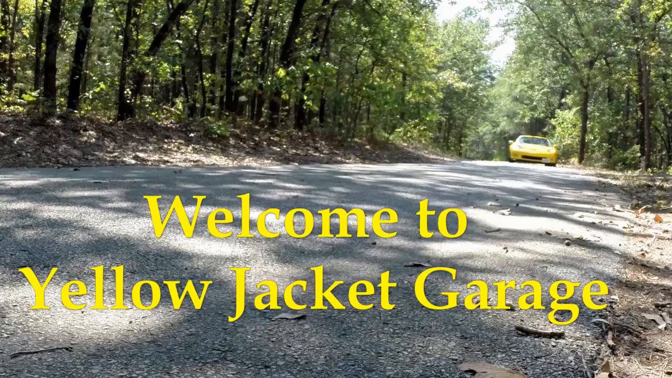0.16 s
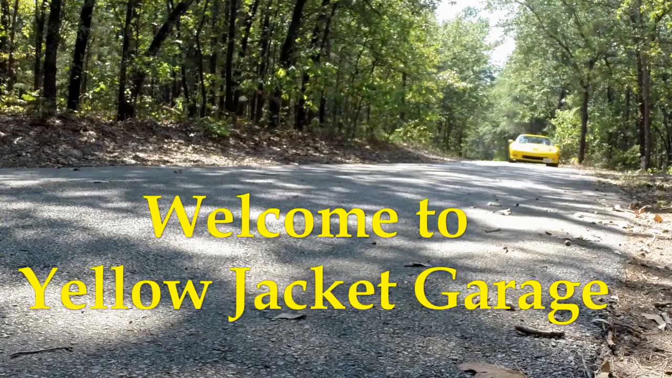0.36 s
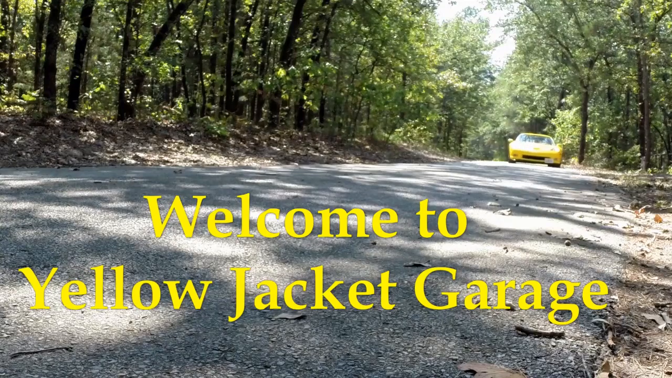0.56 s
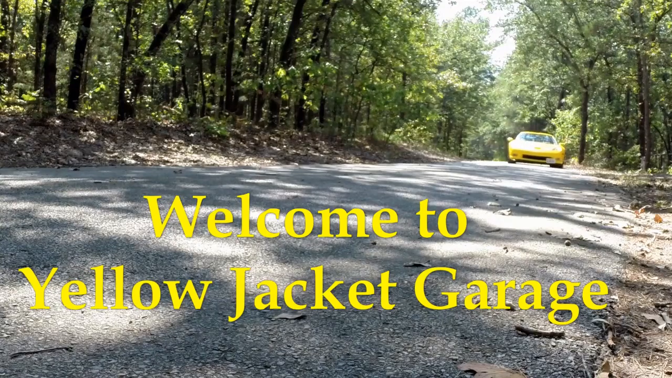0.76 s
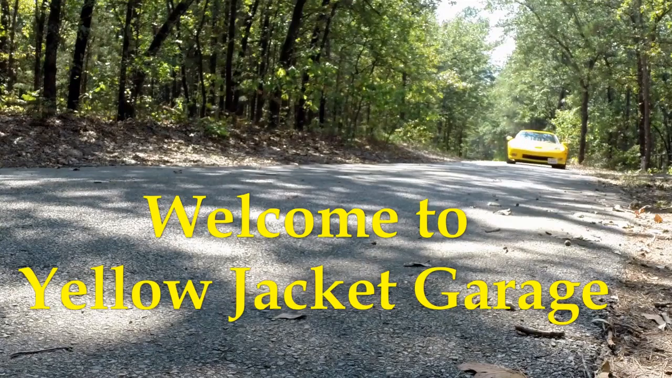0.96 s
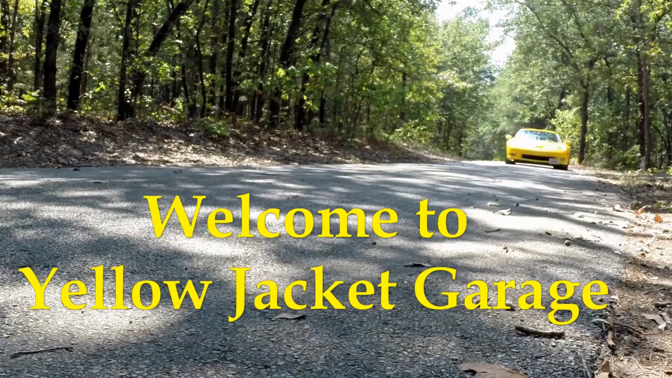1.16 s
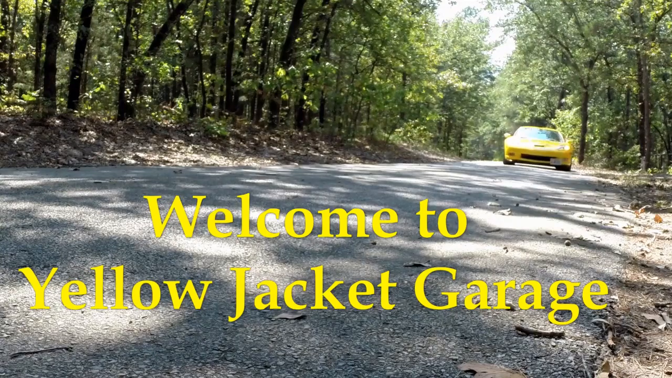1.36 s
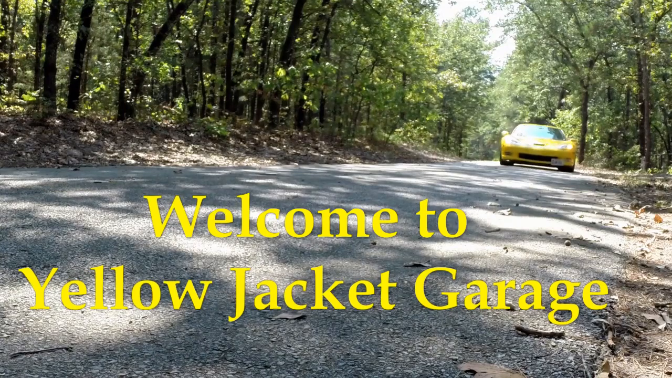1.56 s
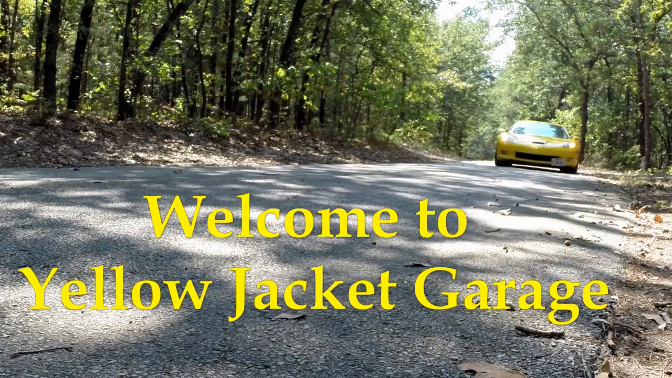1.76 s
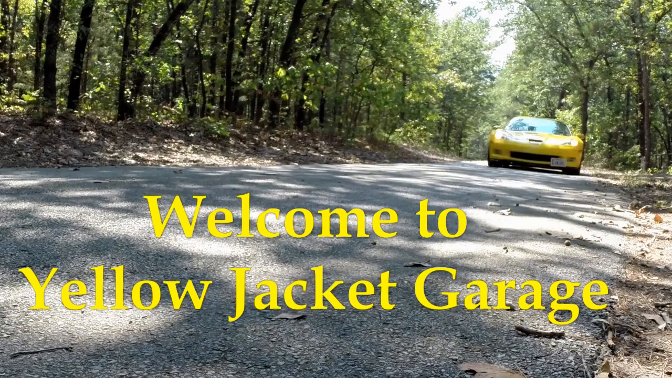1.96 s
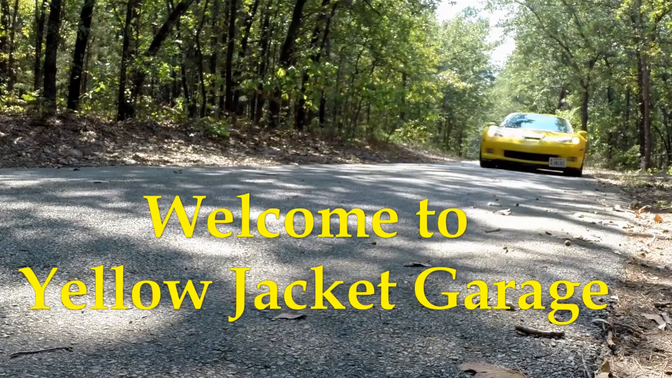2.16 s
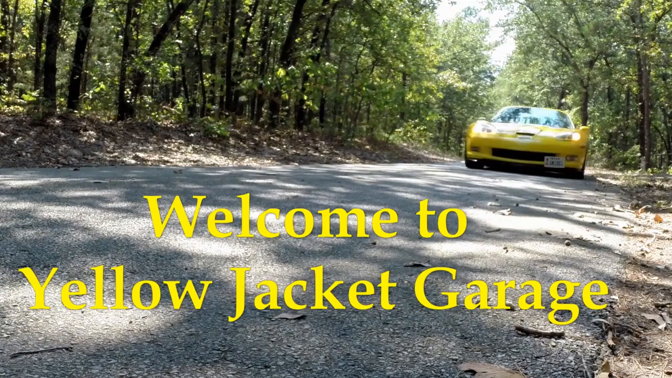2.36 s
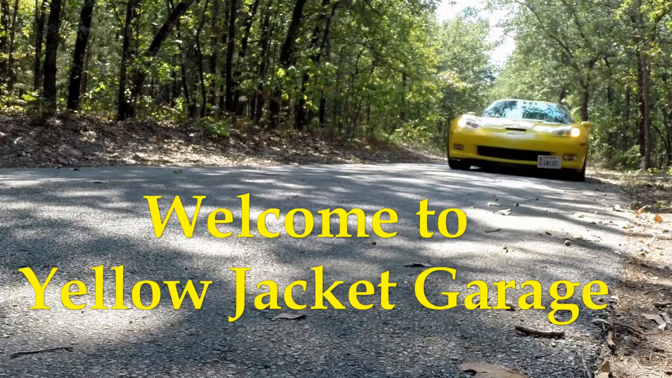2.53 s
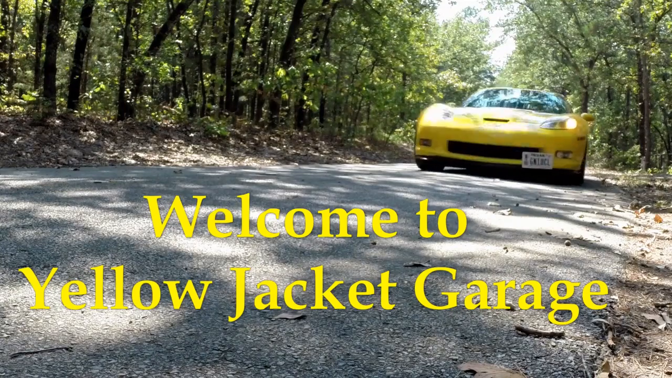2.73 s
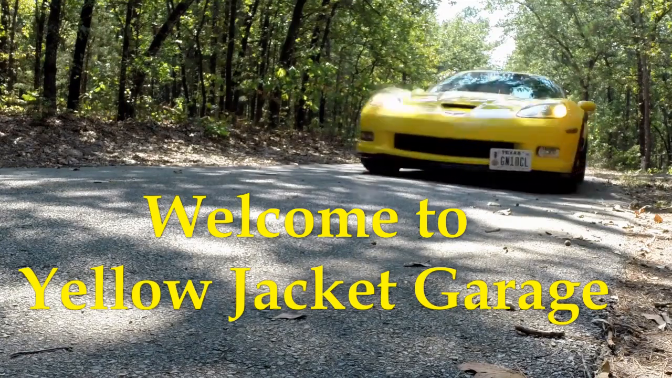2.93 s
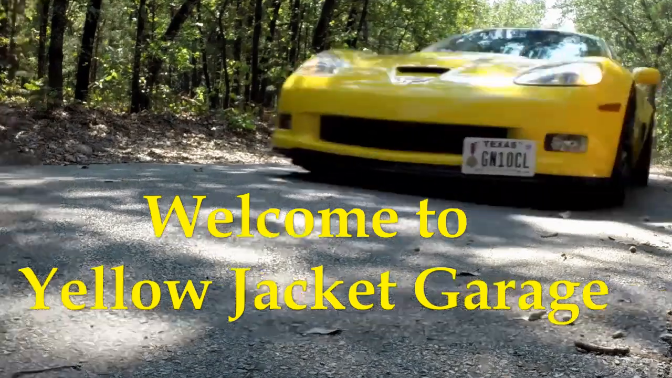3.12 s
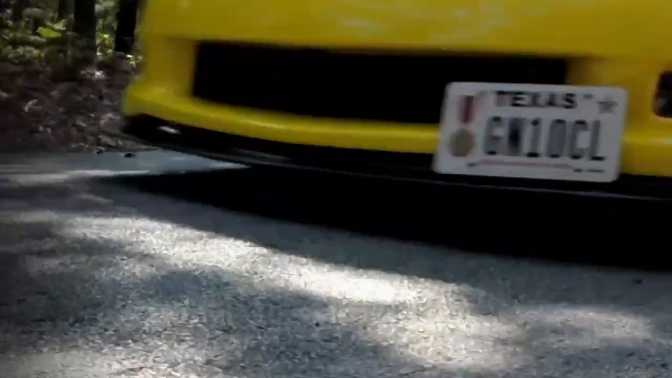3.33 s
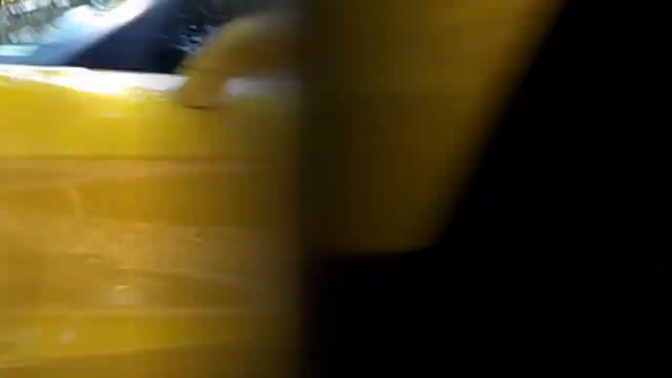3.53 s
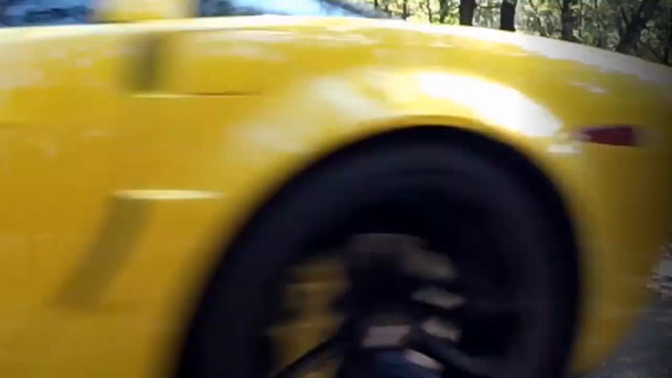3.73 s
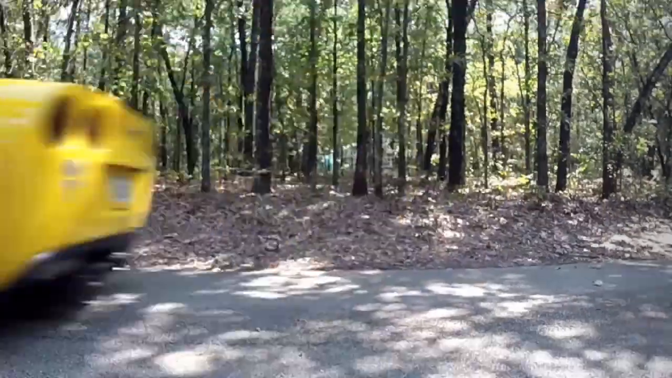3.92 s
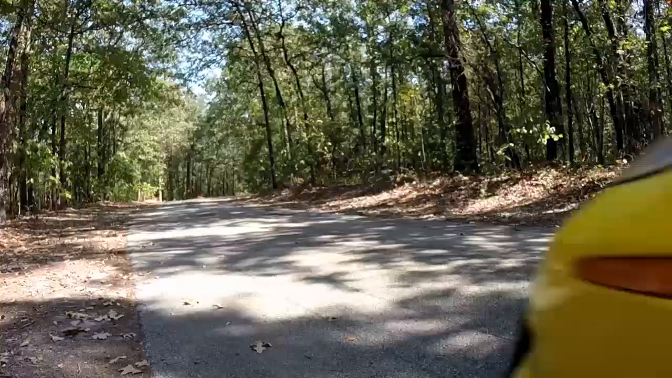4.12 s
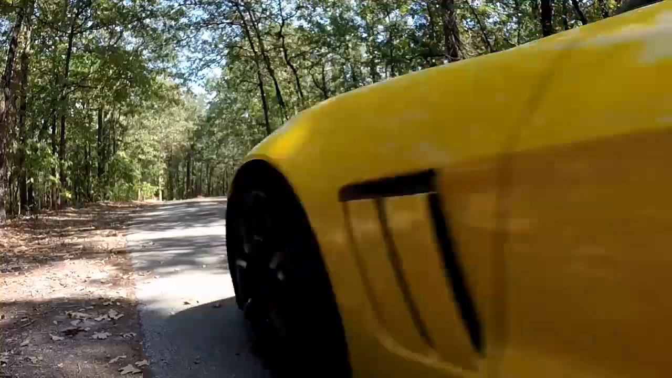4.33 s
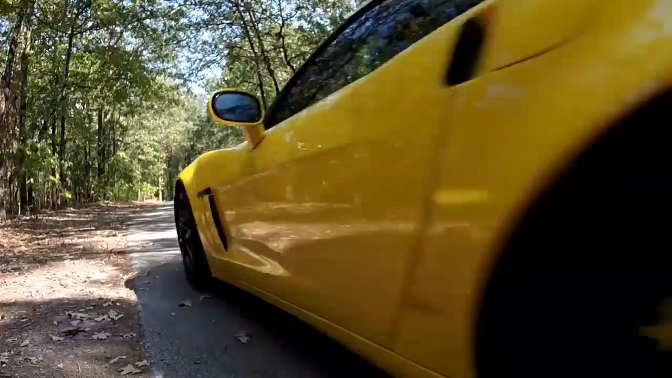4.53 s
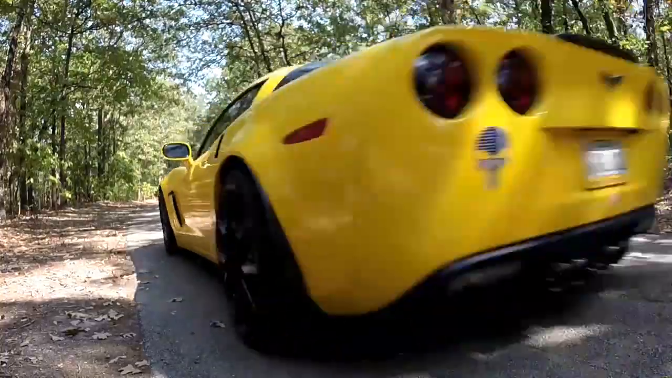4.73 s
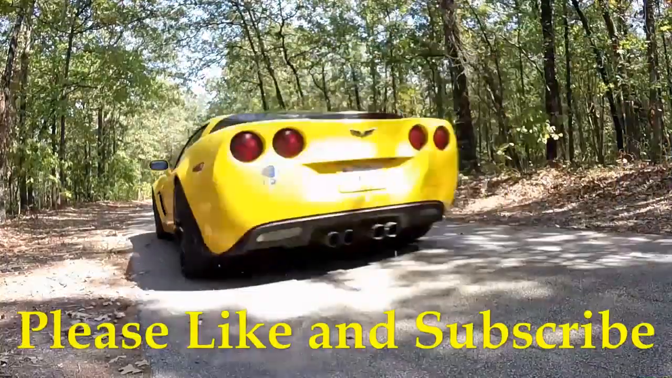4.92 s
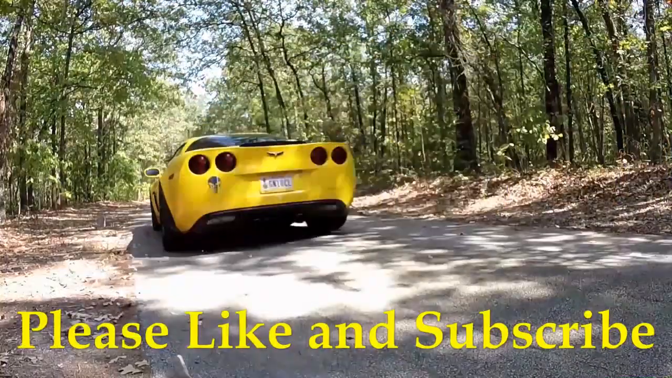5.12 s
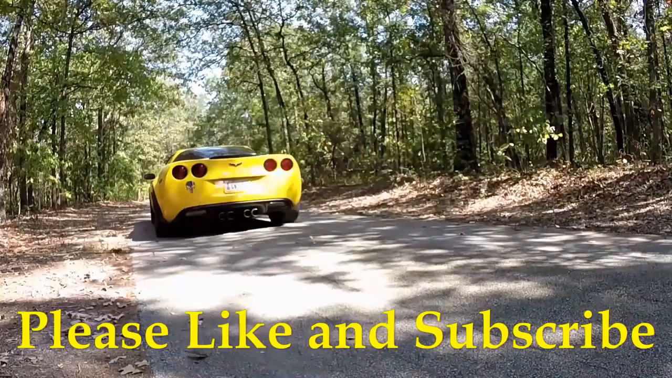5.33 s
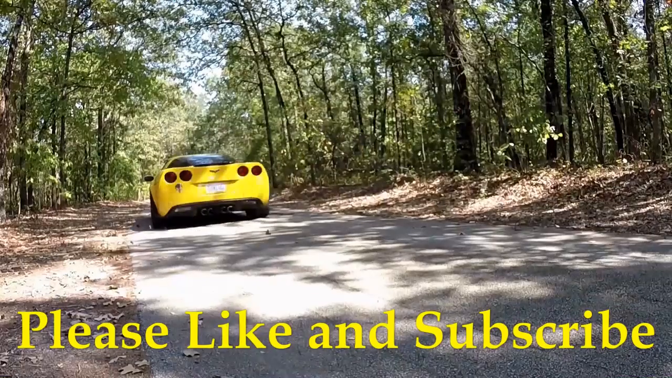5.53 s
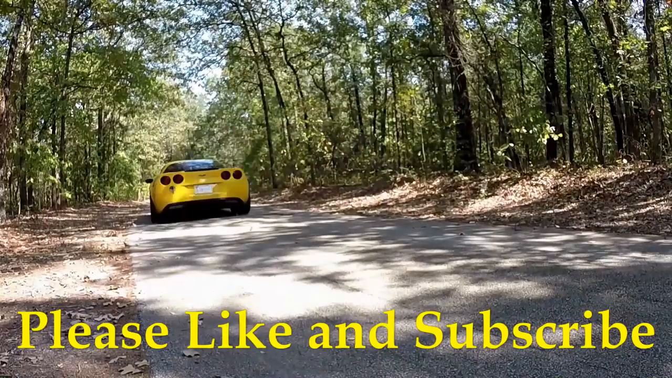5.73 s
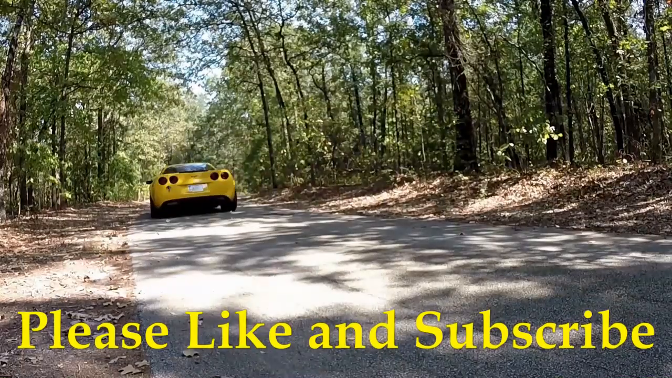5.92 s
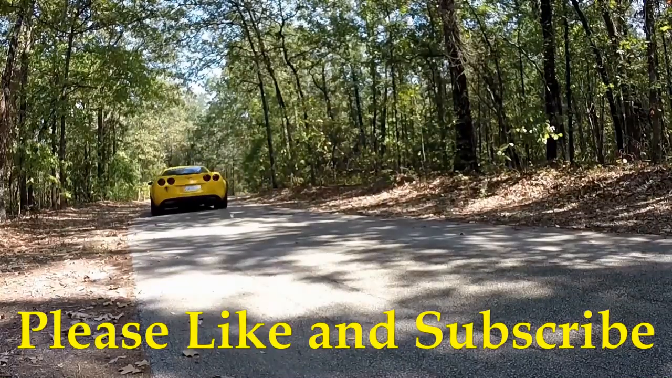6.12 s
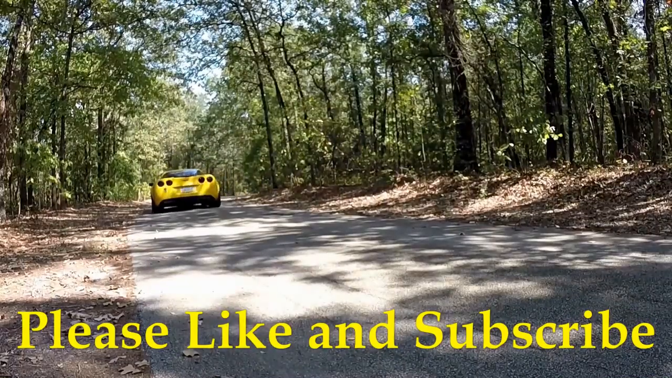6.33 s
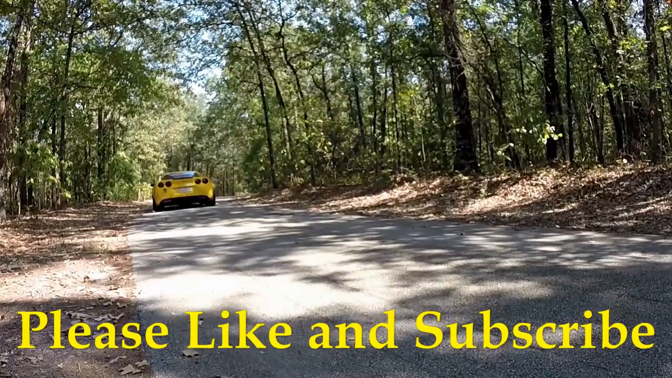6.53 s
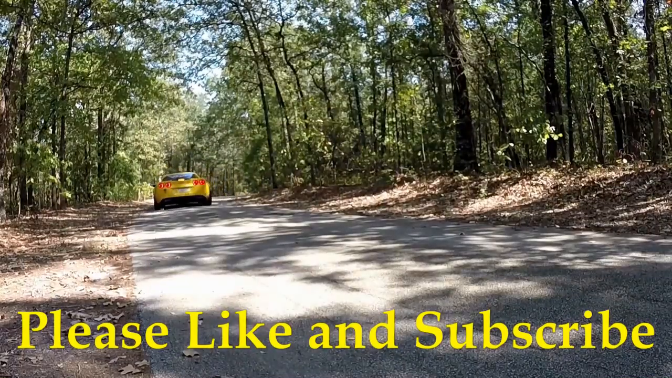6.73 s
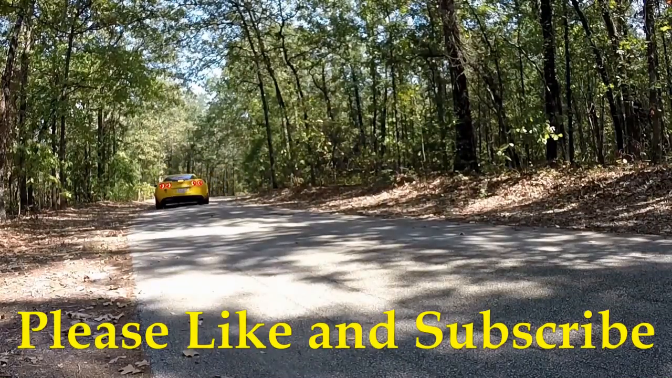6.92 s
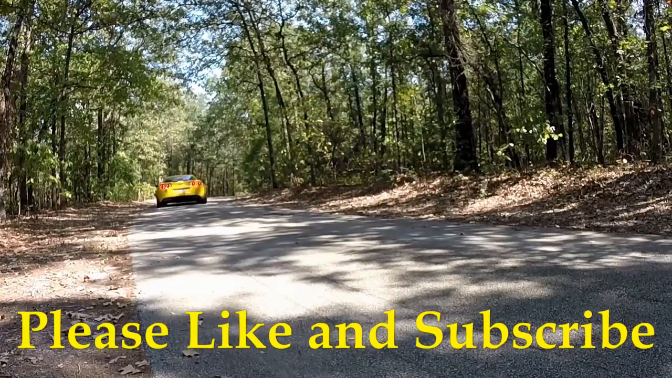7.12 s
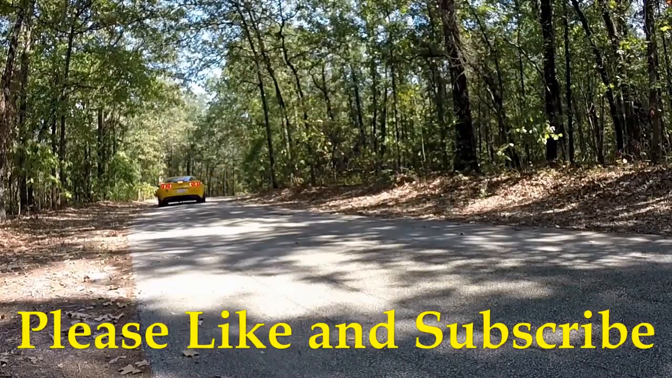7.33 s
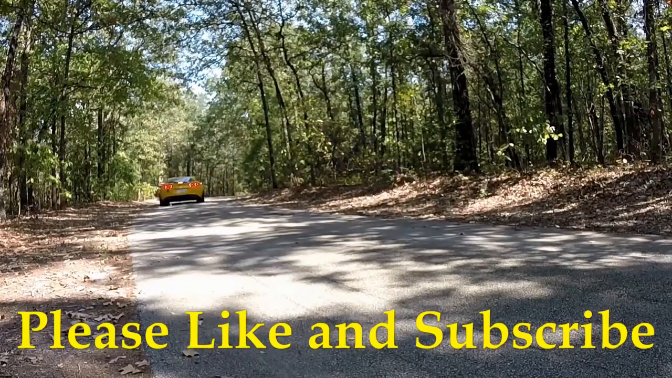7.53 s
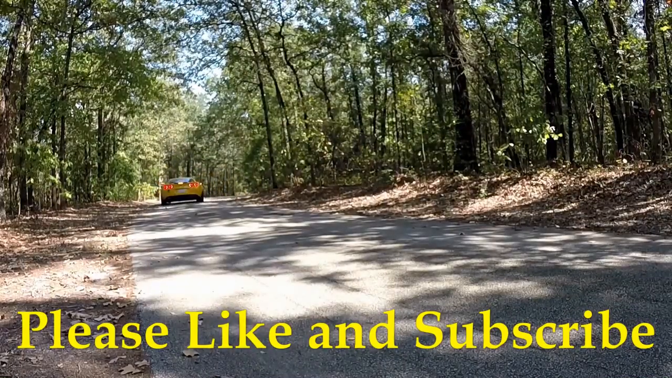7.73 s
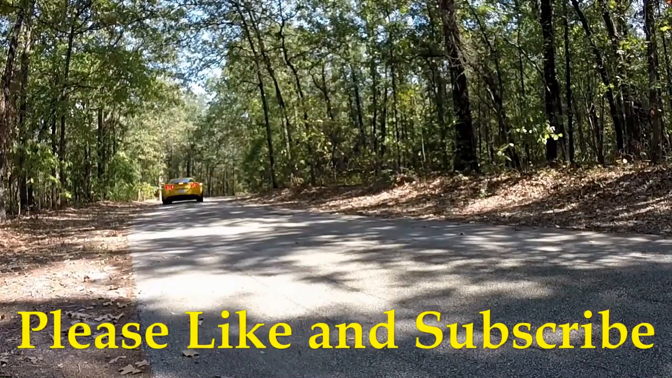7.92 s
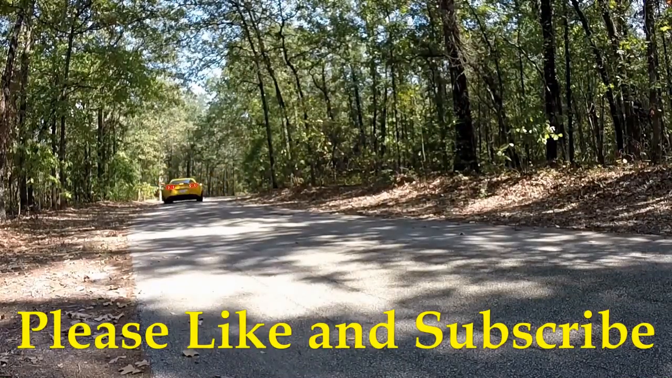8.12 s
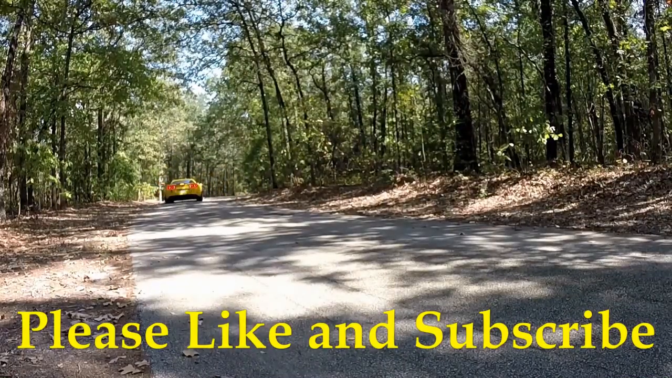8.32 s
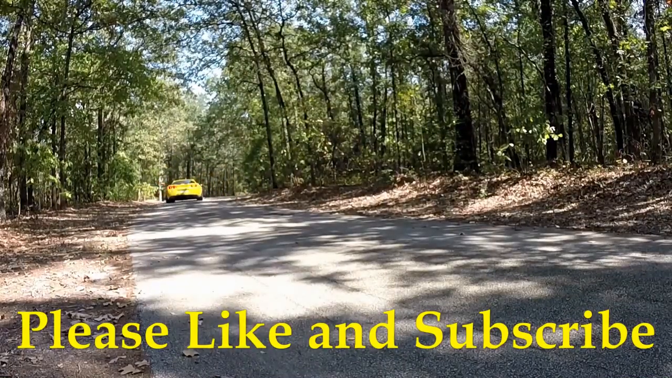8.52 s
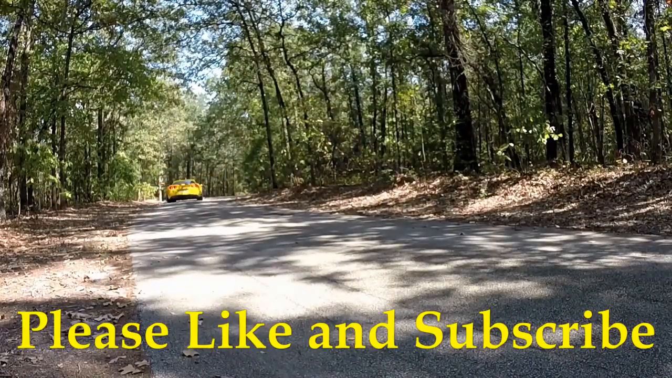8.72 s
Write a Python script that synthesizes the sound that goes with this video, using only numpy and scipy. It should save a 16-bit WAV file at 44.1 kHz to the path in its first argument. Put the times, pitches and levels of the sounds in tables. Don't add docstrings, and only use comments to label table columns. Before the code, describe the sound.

On a quiet forest lane, a powerful eight-cylinder car approaches from a distance, its low hum climbing and growing lumpy. Close by it bangs once and blips upward. An abrupt cut brings a second close pass: bright tyre hiss and raspy exhaust, then an uneven, popping burble that sinks in pitch and fades. Grit ticks occasionally. Close stereo roadside microphone, nearly centred, with slightly dulled treble and faint tree reflections.

```python
import sys
import numpy as np
from scipy import signal
from scipy.fft import rfft, irfft, next_fast_len
from scipy.io import wavfile
from scipy.ndimage import uniform_filter1d, map_coordinates

SR = 44100
rng = np.random.default_rng(int(sys.argv[2]) if len(sys.argv) > 2 else 0)


def rack_gain(trim_db):
    fader = np.asarray(trim_db, float)
    return 10 ** (fader / 20)


def dump(signal):
    limited = np.clip(np.atleast_2d(signal).T, -1, 1)
    pcm = np.round(limited * 32767).astype(np.int16)
    wavfile.write(sys.argv[1], SR, pcm)


N = 386757

# [f/Hz, level/dB per Hz]
TAILPIPE_RING = [(220, -46.5), (380, -15.5), (409, -10), (462, -2.5), (515, -5.5), (575, 0), (623, -6.5),
                 (691, 0.5), (910, -10.5), (1070, -31.5), (1170, -21.5), (1500, -30.5), (1950, -53.5),
                 (3300, -120)]


def level(x, db):
    return x * rack_gain(db) / np.sqrt(np.mean(x ** 2))


def curves(table):
    s, *columns = np.transpose(table)
    return [np.interp(np.arange(N) / SR, s, c) for c in columns]


def shape(table, hz):
    f, db = np.transpose(table)
    return np.interp(np.log(hz + 1), np.log(f), db)


def colour(x, table, beyond_db=-40):
    hz = np.fft.rfftfreq(8192, 1 / SR)
    above = np.maximum(np.log2((hz + 1) / table[-1][0]), 0)
    below = np.maximum(np.log2(table[0][0] / (hz + 1)), 0)
    gain_db = np.maximum(shape(table, hz) + beyond_db * (above + below), -110)
    cepstrum = irfft(np.log(rack_gain(gain_db)))
    cepstrum[1:4096] *= 2
    cepstrum[4097:] = 0
    return signal.fftconvolve(x, irfft(np.exp(rfft(cepstrum))))[:N]


def band(x, hz):
    edges = [hz * 2 ** (-1 / 6), hz * 2 ** (1 / 6)]
    return signal.sosfilt(signal.butter(2, edges, "bandpass", fs=SR, output="sos"), x)


def walk(rate, size=N):
    hold = max(int(SR * size / N / rate), 1)
    steps = np.repeat(rng.standard_normal(size // hold + 1), hold)
    return uniform_filter1d(uniform_filter1d(steps, hold), hold)[:size]


def orders(speed, table, pattern, pipes, sway_db, sway, spread):
    # [f/Hz, level/dB]
    uneven_pipes = [(40, -21.5), (70, -8.5), (105, 1), (190, 1), (330, -3), (430, 0.5), (530, -13.5),
                    (600, -8)]
    coarse = 8
    hz = uniform_filter1d(curves(speed)[0][::coarse], size=300)
    tone_db, load_db, uneven_db = (c[::coarse] for c in curves(table))
    turn = 2 * np.pi * np.cumsum(hz) * coarse / SR
    out = 0
    for k, pipe in enumerate([[(1, 0)], *pipes]):
        db = tone_db + k * load_db + shape(pipe, (k + 1) * hz) + 0.67 * sway_db * walk(4, size=len(hz))
        out = out + np.sqrt(2) * rack_gain(db) * np.sin((k + 1) * turn + spread * k ** 2)
    for multiple, db in pattern:
        eighths = round(8 * multiple)
        m = eighths / 8
        start = np.pi / 2 * (eighths % 2)
        start += spread * (m - 1) ** 2
        wander, drift = walk(5, size=len(hz)), walk(4, size=len(hz))
        if m not in (1, 2, 3):
            order_db = tone_db + uneven_db + db + shape(uneven_pipes, m * hz) + sway_db * wander
            out += rack_gain(order_db) * np.sin(m * turn + start + sway * (1 + m) / 2 * drift)
    return signal.resample_poly(out, coarse, 1)[:N], np.repeat(hz, coarse)[:N]


def arriving_engine():
    # [t/s, f/Hz]
    speed = [
        (0.0, 91.8),
        (0.6, 106.5),
        (1.35, 129.5),
        (2.1, 140.4),
        (2.85, 149.6),
        (3.44, 145),
        (3.95, 224),
        (4.02, 222),
        (4.17, 190),
    ]
    # [t/s, firing tone level/dB, load level/dB per higher multiple, unevenness level/dB over the tone]
    strength = [
        (0.0, -20, -15, -28.5),
        (0.45, -17.5, -15, -24),
        (1.0, -21.5, -11, -11.5),
        (1.9, -26, -10, -0.5),
        (2.95, -26.5, -11, 3.5),
        (3.45, -21, -10, -8.5),
        (3.95, -17, -11.5, -15),
        (4.06, -21.5, -29, -9),
        (4.2, -19.5, -37, -2.5),
    ]
    # [multiple of the firing rate, level/dB]
    bank_orders = [(0.124, -42), (0.25, -19), (0.374, -37.5), (0.5, -21), (0.625, -2.5), (0.752, -2),
                   (0.875, -2), (1.001, 0), (1.118, -11), (1.25, -0.5), (1.38, -7.5), (1.5, -42),
                   (1.621, -9.5), (1.75, -4), (1.88, -13), (2, -13), (2.12, -20.5), (2.25, -23),
                   (2.382, -23), (2.5, -17.5), (2.62, -39), (2.75, -38.5), (2.88, -38), (2.999, -23),
                   (3.12, -28.5), (3.248, -39), (3.382, -30.5), (3.502, -34.5), (3.621, -44), (3.752, -29),
                   (3.88, -33.5), (4, -10)]
    # [f/Hz, level/dB]
    second_pipe = [(180, -4.5), (200, -12), (235, 4), (272, -2), (298, 2), (340, 0), (440, -0.5)]
    third_pipe = [(275, 7), (295, 9), (320, 3), (350, -8), (450, -16), (520, 2), (660, 5)]
    return orders(speed, strength, bank_orders, (second_pipe, third_pipe), sway_db=1.7, sway=0.3, spread=4.2)


def firings(hz, scatter_db, late):
    at = np.flatnonzero(np.diff(np.floor(np.cumsum(hz) / SR)))
    strength, scatter, timing = rng.standard_normal((len(at), 3)).T
    pulses = np.zeros(N)
    shift = (late * timing * SR / hz[at]).astype(int)
    np.add.at(pulses, np.clip(at + shift, 0, N - 1), strength * rack_gain(scatter_db * scatter))
    return level(pulses, 0)


def exhaust(hz, behind, rasp_db, burble_db):
    # [f/Hz, level/dB per Hz]
    muffler_boom = [(12, -44.5), (20, -17), (59, -12), (92, -2), (140, -4), (214, 0.5), (259, -8),
                    (309, -8), (370, -22), (420, -26.5), (550, -61.5), (920, -120)]
    bay_hum = [(240, -37), (400, 6.5), (432, 4), (510, -7), (589, 1.5), (633, -1), (872, -3.5),
               (1500, -29.5), (1950, -42.5), (3300, -120)]
    pops = firings(hz, scatter_db=1.5, late=0.245)
    gas = rng.standard_normal((2, N))
    burble = level(colour(pops + 0.6 * gas[0], muffler_boom), 0) * rack_gain(1.8 * walk(18))
    source = 0.63 * pops + gas[1]
    bay = level(colour(source, bay_hum), 0)
    pipe = level(colour(source, TAILPIPE_RING), 0)
    rasp = (bay + behind * (pipe - bay)) * rack_gain(1.3 * walk(15))
    return rack_gain(rasp_db) * (rasp + rack_gain(burble_db) * burble)


def tyres(behind, hiss_db, treble_db):
    # [f/Hz, level/dB per Hz]
    front_hiss = [(590, -29), (1000, 4), (1610, -1), (1820, -8), (2070, -1), (2610, 0.5), (5290, -15.5),
                  (10400, -27.5), (12200, -37), (13500, -61.5)]
    rear_hiss = [(590, -30), (1000, 4.5), (1740, -0.5), (2120, 3), (3730, -5), (4850, -10.5), (6580, -13),
                 (9420, -21), (10900, -19.5), (13500, -40.5)]
    out, gust = 0, walk(7)
    hits = rng.random(N) < 60 / SR
    crackle = hits * rng.standard_normal(N) * rack_gain(3.5 * rng.exponential(size=N))
    for hz in 1000 * 2 ** np.arange(0, 3.8, 1 / 3):
        high = max(np.log2(hz / 2600), 0)
        front_db, rear_db = shape(front_hiss, hz), shape(rear_hiss, hz)
        db = front_db + behind * (rear_db - front_db)
        db = db + np.maximum(treble_db + 12.5, -8) * high
        db = db + 0.075 * (high + 0.3) * gust + 1.2 * walk(15)
        out = out + rack_gain(db) * band(rng.standard_normal(N) + min(high, 1.2) * crackle, hz)
    return rack_gain(hiss_db + 9.5) * out


def rumble(behind):
    # [t/s, level/dB]
    gusts = [(3.2, -29), (3.42, -27), (4.28, -42), (5.01, -31), (5.23, -32), (6.05, -33), (6.68, -29),
             (7.35, -32), (7.69, -32), (8.16, -35)]
    far_db, near_db, gust_s = -53.5, -46, 0.092
    t = np.arange(N) / SR
    low = signal.butter(2, [16, 55], "bandpass", fs=SR, output="sos")
    road = rack_gain(far_db + behind * (near_db - far_db) + 2.1 * walk(2.4))
    air = sum(rack_gain(db) * np.exp(-((t - s) / gust_s) ** 2) for s, db in gusts)
    return level(signal.sosfilt(low, rng.standard_normal(N)), -3.7) * (road + air)


def trees(x):
    t60_s = 0.72
    t = np.arange(SR // 2) / SR
    tails = rng.standard_normal((2, len(t))) * np.exp(-np.log(1000) * t / t60_s) * (t > 0.012)
    return [signal.fftconvolve(x, tail / np.sqrt(np.sum(tail ** 2)))[:N] for tail in tails]


def grit():
    # [t/s, peak level/dB, ring f/Hz, crack level/dB over the ring]
    small_stones = [(0.445, -51, 3580, 3), (0.5467, -43, 4100, -22), (2.2035, -32, 3470, -12),
                    (2.8925, -28, 3130, -18), (4.8453, -18.5, 5150, -3), (5.4556, -34, 4540, -20.5),
                    (6.198, -30, 3570, -6), (6.475, -32, 3070, -16), (7.1227, -49, 3350, -15),
                    (8.274, -38, 2940, -10), (8.454, -40, 3600, -12), (8.5583, -37, 3200, -5)]
    single_knock = [
        (7.291, -26, 1014, -51),
    ]
    size = 400
    out, t = np.zeros(N + size), np.arange(size) / SR
    for s, db, hz, crack_db in small_stones + single_knock:
        rise = 3.2 / hz
        crack = np.sin(2 * np.pi * np.cumsum(10500 + 3000 * rng.standard_normal(size)) / SR)
        ring = np.sin(2 * np.pi * np.cumsum(hz * (1 + 0.76 * rng.standard_normal(size))) / SR)
        snap = (ring + rack_gain(crack_db) * crack) * t / rise * np.exp(1 - t / rise)
        out[int(s * SR):int(s * SR) + size] += rack_gain(db) * snap
    return out[:N]


def bangs():
    # [t/s, peak level/dB]
    single_bangs = [(3.457, -9.5), (5.061, -13), (5.117, -20), (5.233, -12), (5.366, -11.5), (6.15, -25),
                    (6.183, -37), (6.572, -23), (7.002, -11.5), (7.094, -10), (7.296, -16), (7.723, -20),
                    (7.802, -19.5), (7.999, -26), (8.311, -31)]
    s, db = np.transpose(single_bangs)
    pulses = np.zeros(N)
    pulses[((s - 0.001) * SR).astype(int)] = rack_gain(db)
    ring = colour(pulses, TAILPIPE_RING)
    return ring * np.max(pulses) / np.max(np.abs(ring)) * rack_gain(-4.5)


def leaving_engine():
    # [t/s, f/Hz]
    speed = [
        (4.16, 142.8),
        (4.6, 148.3),
        (4.9, 141.2),
        (5.8, 132.8),
        (6.1, 126.3),
        (6.7, 119),
        (7.9, 91.8),
        (8.35, 77.5),
        (8.77, 77.3),
    ]
    # [t/s, firing tone level/dB, load level/dB per higher multiple, unevenness level/dB over the tone]
    strength = [
        (4.16, -23.5, -10, 6.5),
        (4.85, -19, -5, 5),
        (5.2, -25, -5, 6),
        (5.9, -24, -7.5, -1.5),
        (6.5, -20.5, -19, -4.5),
        (6.7, -23, -3, 2),
        (7.9, -23.5, -8.5, -11.5),
        (8.2, -33, 0, -3),
        (8.77, -35.5, -2, 7),
    ]
    # [multiple of the firing rate, level/dB]
    bank_orders = [(0.125, -28.5), (0.25, -28), (0.375, -9.5), (0.5, -15), (0.625, -2), (0.75, -9),
                   (0.875, -13.5), (1, -2), (1.12, -11), (1.25, -2.5), (1.38, 0), (1.5, -21.5), (1.62, -8),
                   (1.75, -5.5), (1.88, -9), (2, -7), (2.12, -17.5), (2.25, -17), (2.38, -23), (2.5, -22.5),
                   (2.62, -21), (2.75, -22), (2.88, -23.5), (3, -20.5), (3.12, -16.5), (3.25, -34.5),
                   (3.38, -20.5), (3.5, -28.5), (3.62, -24), (3.75, -22.5), (3.88, -31), (4, -10.5)]
    # [f/Hz, level/dB]
    second_pipe = [(155, 4), (185, 7), (222, 11.5), (255, -2), (290, 4)]
    third_pipe = [(240, -8), (280, 0), (336, -2), (360, -16), (440, -16)]
    return orders(speed, strength, bank_orders, (second_pipe, third_pipe), sway_db=2.6, sway=0.45, spread=5.5)


def mirrored(x):
    closest_s, kerb_s, blurred_s = 4.42, 0.1, 5.9
    t = np.arange(N) / SR
    lag = 0.00024 / np.hypot(t - closest_s, kerb_s)
    bounce = uniform_filter1d(map_coordinates(x, [(t - lag) * SR], mode="mirror"), size=6)
    fades = [closest_s + kerb_s, closest_s + 4 * kerb_s, blurred_s - 4 * kerb_s, blurred_s]
    share = 0.3 * np.interp(t, fades, [0, 1, 1, 0])
    return (x + share * bounce) / (1 + share / 2)


def scene():
    # [t/s, tyre level/dB, exhaust gas level/dB]
    nearness = [(0.0, -54.5, -47.5), (0.78, -49.5, -45.5), (1.46, -48, -43), (2.59, -43.5, -40),
                (3.08, -38.5, -34.5), (3.38, -38.5, -32.5), (3.52, -36.5, -28), (3.9, -33.5, -25.5),
                (4.01, -41.5, -31.5), (4.19, -45, -30), (4.25, -32, -24.5), (4.4, -26.5, -25),
                (4.58, -31.5, -23), (4.85, -40.5, -29.5), (5.64, -49, -28.5), (6.72, -45, -25),
                (7.52, -49, -29), (8.77, -50.5, -35.5)]
    change_s = 4.19, 4.24
    t = np.arange(N) / SR
    second = np.interp(t, change_s, [0, 1])
    behind = np.interp(t, [3.3, 3.55, *change_s], [0.25, 0.0, 0.76, 1])
    nose, nose_hz = arriving_engine()
    tail, tail_hz = leaving_engine()
    hiss_db, gas_db = curves(nearness)
    treble_db = -10 + 0.06 * (hiss_db - np.mean(hiss_db))
    burble_db = 7.5 + 0.9 * np.maximum(-40 - gas_db, 0) - 6 * behind * (1 - second)
    road = mirrored(tyres(second, hiss_db, treble_db)) + grit()
    firing_hz = nose_hz + second * (tail_hz - nose_hz)
    gas = exhaust(firing_hz, behind, gas_db, burble_db) + bangs()
    car = (1 - second) * nose + second * tail + gas + road + rumble(behind)
    mid, side = trees(road)
    return car + rack_gain(-43.5) * mid + rack_gain(-19) * np.array([side, -side])


def patchy_treble(x, jitter_db):
    # [f/Hz, level/dB]
    lost_below = [(3000, -89.5), (5000, -89.5), (7000, -82), (9500, -79), (12000, -79), (14000, -80)]
    # [t/s, length/s, limit level/dB]
    limit_moves = [
        (0.0, 0.2, -18),
        (0.22, 0.1, 14),
        (0.41, 0.06, 14),
    ]
    hz, t, z = signal.stft(x, SR, "cosine", 2048)
    power = uniform_filter1d(np.mean(np.abs(z) ** 2, axis=0), size=2, axis=0)
    move_db = sum(db * ((t >= s) & (t < s + length)) for s, length, db in limit_moves)
    limit_db = shape(lost_below, hz)[:, None] + jitter_db * rng.standard_normal(power.shape[1]) + move_db
    keep = (10 * np.log10(power + 1e-18) > limit_db) | (hz[:, None] < 2200)
    return signal.istft(z * keep * (hz[:, None] < 14500), SR, "cosine", 2048)[1][:, :N]


def band_limit(x):
    return signal.sosfilt(signal.butter(12, 14620, fs=SR, output="sos"), x)


def record(dry):
    # [f/Hz, level/dB]
    port_difference = [(60, 0.0), (110, 0.0), (200, 0.0), (370, 0.0), (680, -1), (1240, -2.5), (2280, -0.5),
                       (4170, -0.5), (7650, 0), (14000, -1)]
    size = next_fast_len(N)
    tilt_db = shape(port_difference, np.fft.rfftfreq(size, 1 / SR)) / 2
    ports = irfft(rfft(dry, size) * rack_gain(np.array([tilt_db, -tilt_db])), size)[:, :N]
    softened = np.tanh(0.77 * ports) / 0.8
    mix = patchy_treble(softened, jitter_db=5.5)
    return band_limit(mix)


dry = scene()
out = record(dry)
dump(out)
```